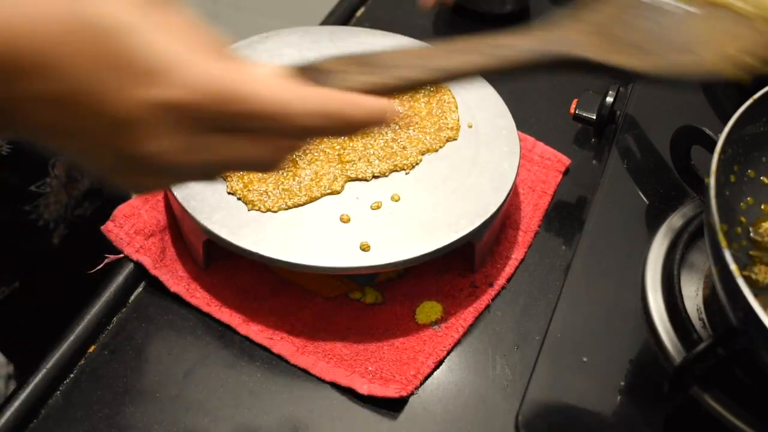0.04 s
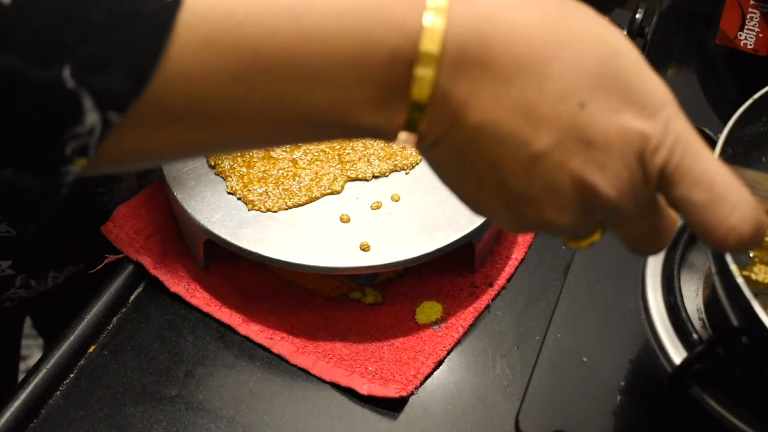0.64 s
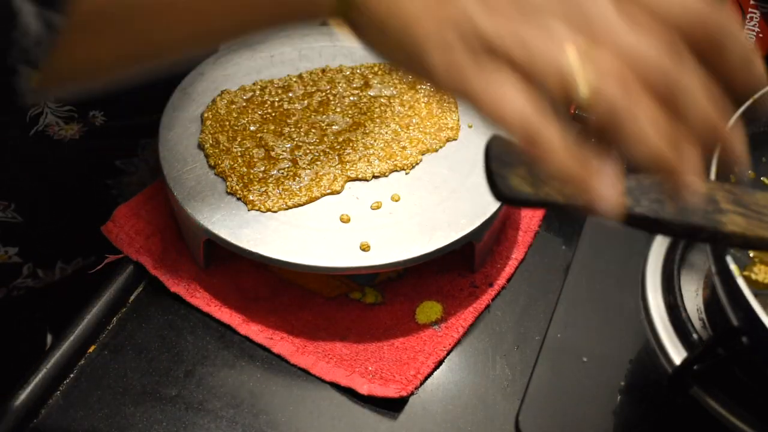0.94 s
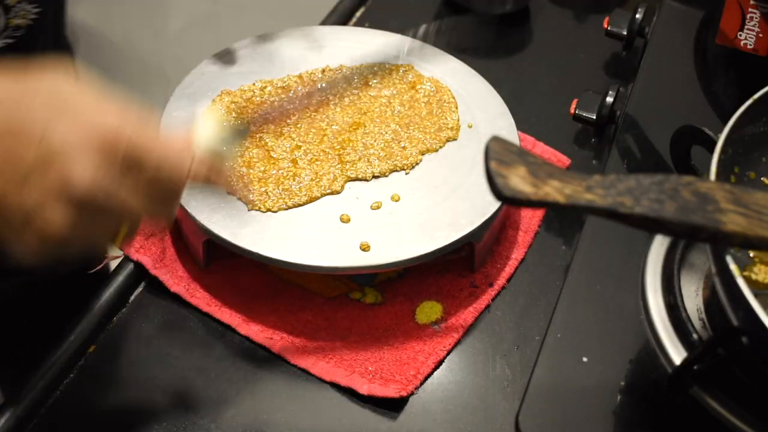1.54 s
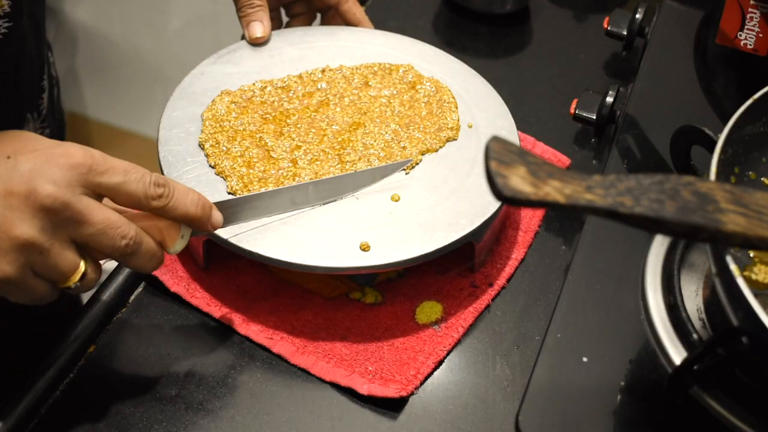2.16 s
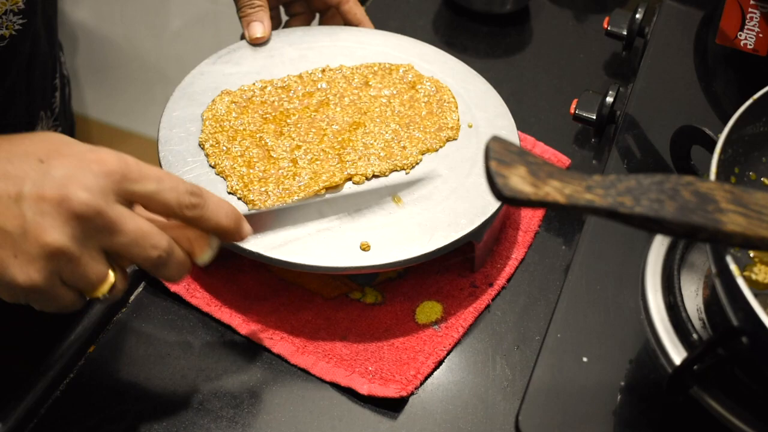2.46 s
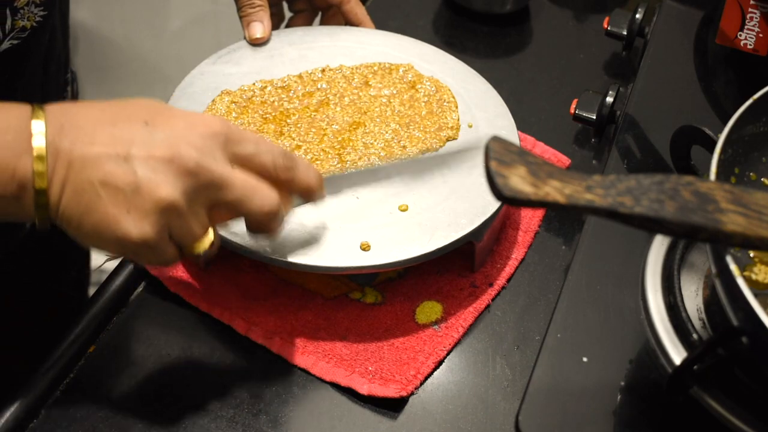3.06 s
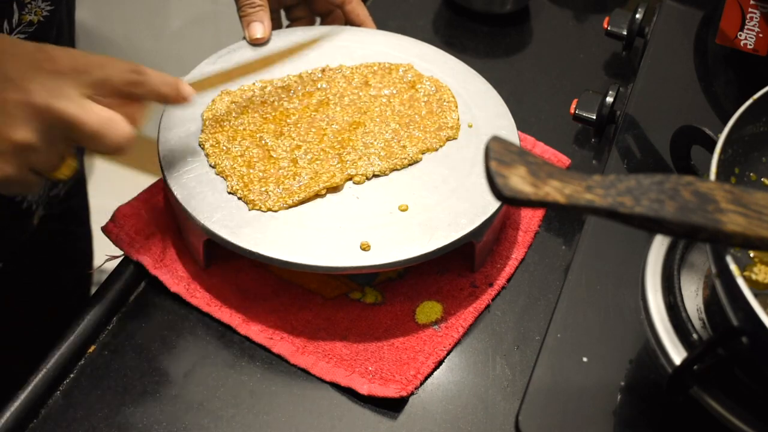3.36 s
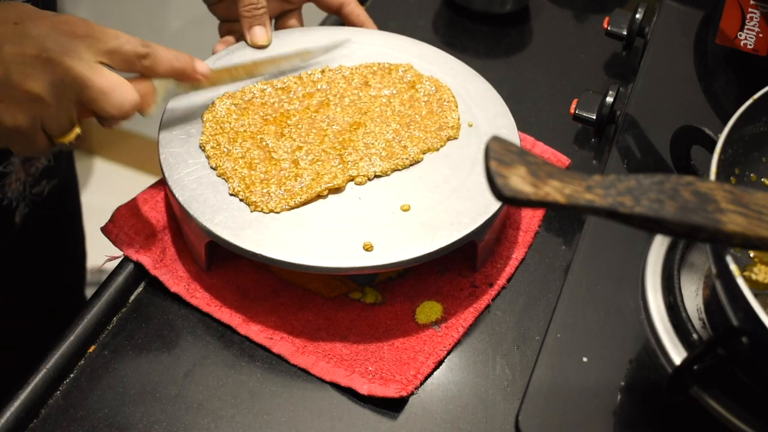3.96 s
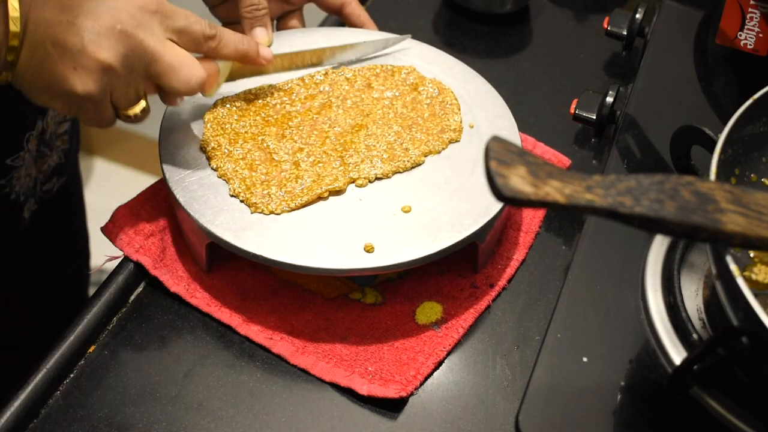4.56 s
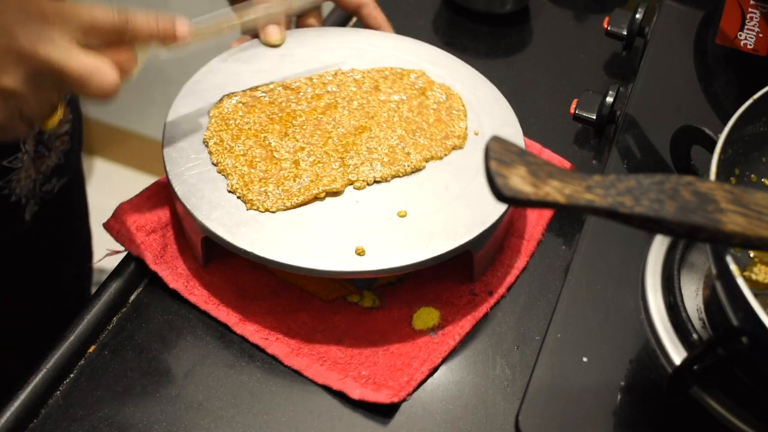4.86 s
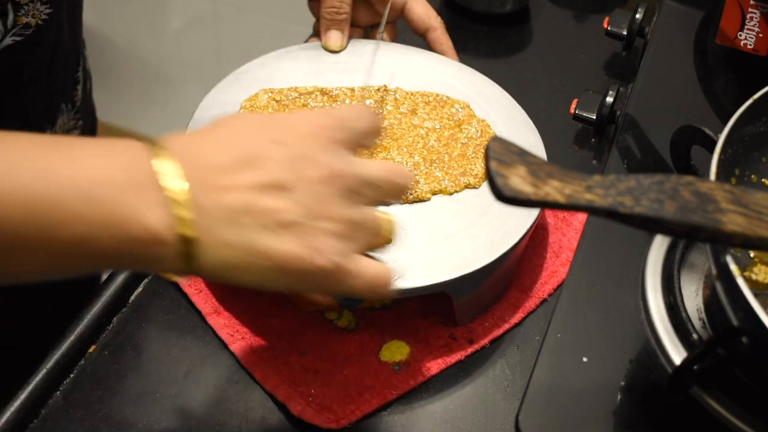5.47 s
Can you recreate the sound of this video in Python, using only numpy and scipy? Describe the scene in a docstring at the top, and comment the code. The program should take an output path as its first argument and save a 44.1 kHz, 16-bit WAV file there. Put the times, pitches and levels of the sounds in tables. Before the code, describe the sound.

A wooden spatula slides quietly over a pot rim and settles with a few dull knocks. A sleeve rustles faintly. Then a table knife clinks sharply onto a steel plate and scrapes along it in short, slightly squeaky strokes that make the metal ring. After a brief pause, more clinks and scrapes follow, ending on one hard clink. It is all close to the microphone in a hard-walled kitchen, with a fan humming faintly.

```python
"""Knife and sesame brittle

A table knife squares up a slab of hot sesame brittle on a steel plate, close by in a hard-walled kitchen.
A fan hums, a sleeve rustles, and a wooden spatula slides over a pot rim and is set down.
Then the blade clinks onto the plate and scrapes along it in short strokes, making the steel ring.
The hardest clinks overload the microphone input."""
import sys
import numpy as np
from scipy import signal
from scipy.fft import rfft, irfft
from scipy.io import wavfile
from scipy.ndimage import map_coordinates

SR = 44100
rng = np.random.default_rng(int(sys.argv[2]) if len(sys.argv) > 2 else 0)


def store_wav(level_fs):
    """Save 16-bit WAV to argv[1]."""
    pcm = np.round(np.clip(np.atleast_2d(level_fs), -1, 1) * 32767)
    wavfile.write(sys.argv[1], SR, pcm.T.astype(np.int16))


N = 247380
SPAN = 32768  # samples in one contact's sound
T = np.arange(SPAN) / SR  # its times [s]
HZ = np.fft.rfftfreq(SPAN, 1 / SR)  # its frequencies


def amp(db):
    """Turn decibels into a gain."""
    return 10 ** (np.asarray(db) / 20)


def unit(x):
    """Scale to an average strength (rms) of 1."""
    return x / np.sqrt(np.mean(x ** 2) + 1e-20)


def along(points, hz):
    """Read between (frequency, value) points on a log frequency axis."""
    freqs, values = np.transpose(points)
    return np.interp(np.log(hz + 1), np.log(freqs + 1), values)


def wobble(rate, size=N):
    """A smooth curve through `rate` random values a second."""
    knots = rng.standard_normal(int(size * rate / SR) + 4)
    return map_coordinates(knots, [np.arange(size) * rate / SR])


def coloured(x, spectrum):
    """Give a scene-long signal a tone colour, at strength 1."""
    return unit(irfft(rfft(x) * amp(along(spectrum, np.fft.rfftfreq(N, 1 / SR))), N))


def resonances(modes):
    """Gain at each frequency of an object with these modes, the notes it rings at."""
    return np.sqrt(sum(amp(db) ** 2 / (1 + (2 * (HZ - hz) / width) ** 2) for hz, width, db in modes))


def ring(force, gain):
    """Send a force through an object with this gain; it rings only after it is pushed."""
    cepstrum = irfft(np.log(np.maximum(gain, 1e-6)))
    cepstrum[1:SPAN // 2] *= 2
    cepstrum[SPAN // 2 + 1:] = 0
    return irfft(rfft(force) * np.exp(rfft(cepstrum)))


def add(track, s, sound):
    """Mix a sound into the track, starting at s seconds."""
    start = max(round(s * SR), 0)
    part = sound[:max(N - start, 0)]
    track[start:start + len(part)] += part


def grit(slips_per_s, spread_db):
    """The force of rubbing: tiny slips of random size at random moments."""
    slips = rng.random(SPAN) < slips_per_s / SR
    return unit(slips * rng.standard_normal(SPAN) * amp(spread_db * rng.standard_normal(SPAN)))


def swell(t, length, rise_share=0.53):
    """A hand movement swells to 1 at t = 0 and eases off, staying strong for `length` seconds."""
    width = length * np.where(t < 0, rise_share, 1 - rise_share)
    return np.exp(-(t / width) ** 2 / 2)


def movements(rows):
    """Loudness over time of several hand movements."""
    t = np.arange(N) / SR
    return np.sqrt(sum((amp(db) * swell(t - s, length)) ** 2 for s, db, length in rows))


# how long the kitchen echoes: (frequency [Hz], time to fade by 60 dB [s])
ECHO_TIMES = [(300, 0.64), (1400, 0.41), (3500, 0.36), (9000, 0.25), (15000, 0.24)]


def kitchen(x, wet_db, build_up_s=0.00088):
    """Add the echo of counter and walls, whose treble dies first."""
    hz, t, noise = signal.stft(rng.standard_normal(SPAN), SR, nperseg=256)
    fade = amp(-60 * t / along(ECHO_TIMES, hz)[:, None])
    tail = signal.istft(noise * fade, SR, nperseg=256)[1][:SPAN]
    tail *= 1 - np.exp(-(T / build_up_s) ** 2)
    return x + amp(wet_db) * signal.fftconvolve(x, tail / np.linalg.norm(tail))[:SPAN]


# tone colour of the moving air: (frequency [Hz], relative level [dB])
AIR_COLOUR = [(15, -52), (25, -28), (108, -21), (149, -20.5), (195, -6.5), (263, -16.5), (326, 1.5),
              (405, -6), (451, 0.5), (863, -7.5), (1790, -7), (4030, -19.5), (7920, -20), (13600, -31),
              (16000, -35)]
# the fan's hum: (frequency [Hz], relative level [dB])
FAN_TONES = [(199.2, -62.5), (441.4, -63), (489.9, -59.5), (915.2, -60), (1809, -61.5), (2600, -60.5)]


def fan():
    """Steady moving air, with a few tones that waver in pitch and strength."""
    t = np.arange(N) / SR
    out = amp(-48.5) * coloured(rng.standard_normal(N), AIR_COLOUR)
    for hz, db in FAN_TONES:
        waver = amp(2.5 * wobble(18))
        tone = np.sin(2 * np.pi * hz * t + 2.93 * wobble(15))
        out += amp(db - 6.5) * unit(waver * tone)
    return out


# a sleeve brushes past: (peak time [s], level [dB], length [s])
SLEEVE_BRUSHES = [(1.26, -56, 0.29), (1.52, -55.5, 0.16), (1.81, -55, 0.17), (5.14, -53.5, 0.22),
                  (5.39, -57.5, 0.092)]
# tone colour of the cloth: (frequency [Hz], relative level [dB])
CLOTH_COLOUR = [(1500, -12), (4000, -7), (8000, -10), (11000, -13.5), (15000, -21)]
# small handling ticks: (time [s], level [dB], pitch [Hz])
HANDLING_TICKS = [(1.342, -44, 13700), (1.522, -37, 5830), (1.919, -40, 6200), (2.447, -12, 9750)]


def handling():
    """A sleeve rustles, and small contacts tick once each."""
    folds = amp(wobble(40))
    out = movements(SLEEVE_BRUSHES) * folds * coloured(rng.standard_normal(N), CLOTH_COLOUR)
    for s, db, hz in HANDLING_TICKS:
        force = rng.standard_normal(SPAN) * np.exp(-T / 0.002)
        tick = ring(force, resonances([(hz, 1400, 0)]) ** 2)
        add(out, s, kitchen(amp(db) * tick / np.abs(tick).max(), wet_db=-5))
    return out


# notes of the pot rim and of the wooden spatula: (frequency [Hz], width [Hz], relative level [dB])
RIM_MODES = [(666, 110, 8), (1840, 26, 5), (2280, 12, 6.5), (4400, 8.7, 5.5), (5330, 86, -4),
             (6840, 44, -11), (7900, 31, -5), (9050, 45, -1), (9900, 61, 0), (10300, 61, -15),
             (11400, 110, -5), (13800, 46, -17)]
WOOD_MODES = [(342, 49, -2), (574, 140, -3), (754, 120, 1), (1110, 160, 0.5), (1630, 220, -1),
              (1700, 110, -7), (1970, 190, -6), (2500, 1100, -6.5)]
# tone colours of the slide's dull rub and its hiss: (frequency [Hz], relative level [dB])
SLIDE_RUB = [(100, -32), (350, -7), (700, -2.5), (2300, 3.5), (3500, 4.5), (6000, -7), (9000, -34)]
SLIDE_HISS = [(3000, -17), (7000, 4), (10000, 0), (12000, -2), (14500, -5), (16000, -14)]
# the spatula is shoved over the rim: (peak time [s], level [dB], length [s])
SPATULA_SHOVES = [(.73, -44, 0.11), (.86, -43, 0.12)]
# its soft knocks: (time [s], level [dB], fade time of the force [s])
SPATULA_KNOCKS = [(0.634, -36, 0.01), (0.894, -20, 0.011), (1.228, -34, 0.022)]


def spatula():
    """Wood slides over the pot rim and makes it sing faintly, then settles with dull knocks."""
    rim = ring(T == 0, resonances(RIM_MODES) + amp(-14))
    friction = rng.standard_normal(N) * amp(0.84 * wobble(120.2))
    rubbing = signal.fftconvolve(friction, rim)[:N]
    slide = coloured(rubbing, SLIDE_RUB) + amp(-5) * coloured(rubbing, SLIDE_HISS)
    out = movements(SPATULA_SHOVES) * slide
    # the knocks lose bass below 400 Hz and treble above 3000 Hz
    wood = resonances(WOOD_MODES) * HZ / np.hypot(HZ, 400) / np.hypot(1, (HZ / 3000) ** 2)
    for s, db, fade_s in SPATULA_KNOCKS:
        press = np.exp(-T / fade_s) * (1 - np.exp(-T / 0.002))
        knock = ring(press * grit(slips_per_s=1100, spread_db=1.5), wood)
        add(out, s, kitchen(amp(db) * knock / np.abs(knock).max(), wet_db=1.5))
    return out


# strongest notes of blade and plate: (frequency [Hz], base width [Hz], level over the weak notes [dB])
STRONG_MODES = [(780, 26.6, 10.5), (1500, 69, 12), (1880, 96, 4), (1990, 28, 3.5), (2200, 51, 3.5),
                (2410, 23, 9), (2530, 46, 9), (2890, 79, 10.5), (3336, 150, 8.5), (3550, 180, 12),
                (4004, 48, 14.5), (4730, 116, 11.5), (5160, 48, 10.5), (5810, 40, -5), (5970, 180, 12),
                (7590, 87, 3.5)]
# the many weak notes between them: (frequency [Hz], relative level [dB])
WEAK_MODES = [(100, -31), (350, -34.5), (750, -6), (1150, -6), (1500, -0.5), (2500, 6), (3150, -0.5),
              (4000, 1.5), (6000, -0.5), (6900, -3), (8600, -5), (9700, -3.5), (12000, -13.5), (16000, -25)]


def steel(blade, damping, treble_db, split_hz):
    """Gain of plate and blade; each spot touched favours other notes and shifts their pitch a little."""
    hz, width, db = np.transpose(STRONG_MODES)
    detune = 1 + .005 * rng.standard_normal(len(hz))
    strength = db + 2.2 * rng.standard_normal(len(hz))
    modes = resonances(zip(hz * detune, width * damping, strength))
    gain = amp(along(WEAK_MODES, HZ)) * np.sqrt(1 + modes ** 2 + resonances(blade) ** 2)
    treble = 1 / (1 + (split_hz / (HZ + 1)) ** 8)
    return unit(unit(gain * (1 - treble)) + amp(treble_db) * unit(gain * treble))


# pushes of the blade: (peak time [s], relative level [dB], length [s], blade pitch [Hz])
BLADE_PUSHES = [(2.147, -15, 0.035, 1500), (2.165, -16.5, 0.034, 2590), (2.422, -9.5, 0.02, 1840),
                (2.484, -30, 0.023, 1880), (2.548, -18.5, 0.047, 1600), (2.629, -11, 0.032, 1804),
                (2.738, -16.5, 0.033, 1760), (2.803, -14, 0.023, 1825), (2.906, -20, 0.031, 2430),
                (2.975, -18, 0.029, 2410), (3.08, -17.5, 0.037, 2500), (3.157, -13, 0.027, 2450),
                (3.254, -23, 0.021, 2340), (3.793, -16, 0.021, 1460), (3.876, -10, 0.025, 1876),
                (4.065, -15, 0.014, 2200), (4.293, -8.5, 0.012, 2200), (4.425, -34.5, 0.029, 2320),
                (4.479, -17.5, 0.0062, 2270), (4.613, -32, .02, 2350), (4.657, -22, 0.0056, 2420)]
OVERTONE_RATIO = 2.7  # the blade's second note over its first


def scrapes(firm_push_db=-11):
    """The edge chatters over the plate, crushes sugar crumbs and squeaks more the harder it is pushed."""
    out = np.zeros(N)
    t = T - T[SPAN // 8]  # leave time to swell before the peak
    for s, db, length, blade_hz in BLADE_PUSHES:
        push = swell(t, length)
        chatter = amp(1.8 * wobble(345.1, size=SPAN))
        squeak_db = 19.5 + 0.73 * (db - firm_push_db)
        blade = [(blade_hz, 105, squeak_db), (OVERTONE_RATIO * blade_hz, 150, squeak_db - 16)]
        gain = steel(blade, damping=0.72, treble_db=-10.5, split_hz=4000)
        rasp = ring(push * chatter * grit(slips_per_s=5000, spread_db=1.0), gain)
        crumbs = ring(push * grit(slips_per_s=470, spread_db=3.0), resonances([(11100, 13000, 0)]) ** 3)
        scrape = (unit(rasp) + amp(-27) * unit(crumbs)) * np.sqrt(np.mean(push ** 2))
        add(out, s + t[0], kitchen(amp(db - 3) * scrape, wet_db=-4))
    return out


# the blade lands or catches on the plate: (time [s], relative level [dB], blade pitch [Hz])
BLADE_LANDINGS = [(2.093, 0.5, 1500), (2.389, 1, 1500), (2.887, -13, 2410), (2.982, -13.5, 2350),
                  (3.065, -16.5, 2500), (3.245, -13.5, 2370), (3.603, .5, 1990), (3.879, -4.5, 1830),
                  (4.066, -16, 2890), (4.219, -5, 3010), (4.485, -7.5, 2200), (4.653, -15.5, 2490),
                  (4.827, 2, 2400)]


def clinks():
    """The flat blade slaps down, rattles for a few milliseconds and damps the plate while both ring."""
    out = np.zeros(N)
    for s, db, blade_hz in BLADE_LANDINGS:
        rattle = rng.standard_normal(SPAN) * np.exp(-T / 0.0024)
        # the many tiny contacts of a flat slap stir all frequencies about equally
        force = ring(rattle, np.abs(rfft(rattle)) ** -.5)
        blade = [(blade_hz, 120, 12), (OVERTONE_RATIO * blade_hz, 900, 2)]
        gain = steel(blade, damping=1.27, treble_db=-8 + .4 * db, split_hz=5670)  # harder is brighter
        slap = ring(force, gain * (HZ / 3000) ** 0.06)  # a blow is brighter than a rub
        # the blade bounces twice before it settles
        first, second = np.round(rng.uniform([.001, .003], [.002, .0045]) * SR).astype(int)
        clink = slap + amp(-6.5) * np.roll(slap, first) + amp(-11.5) * np.roll(slap, second)
        add(out, s, kitchen(amp(db + 17) * clink / np.linalg.norm(clink), wet_db=-2))
    return out


def scene():
    """All the sounds meet at one microphone."""
    return (scrapes() + clinks() + spatula() + handling() + fan())[None]


def record(dry):
    """The input overloads a little off-centre, so the hardest clinks thump; the top treble is cut."""
    offset, top_hz = .025, 15800
    flattened = np.clip(dry, -1 + offset, 1 + offset)
    passband = np.clip((top_hz - np.fft.rfftfreq(N, 1 / SR)) / 400 + .5, 0, 1)
    return irfft(rfft(flattened) * passband, N)


dry = scene()
out = record(dry)
store_wav(out)
```